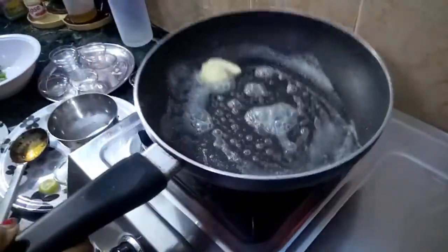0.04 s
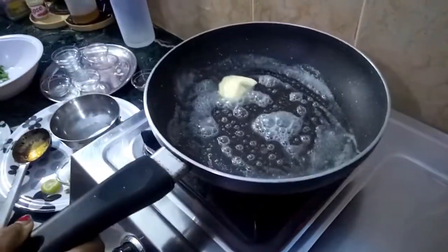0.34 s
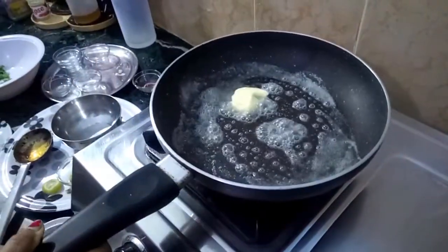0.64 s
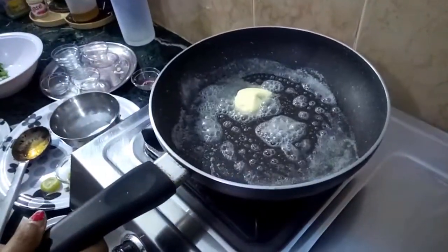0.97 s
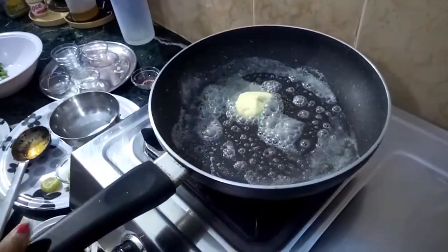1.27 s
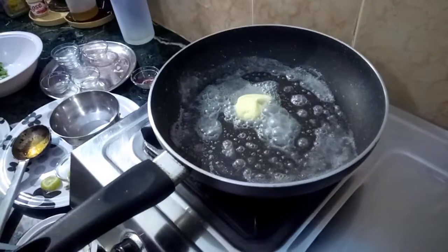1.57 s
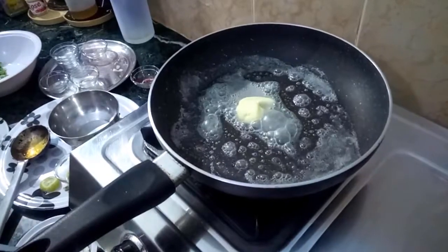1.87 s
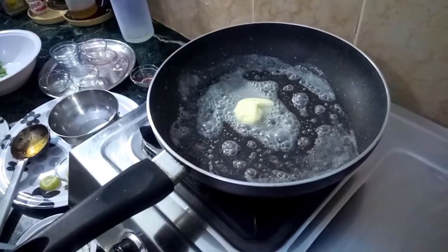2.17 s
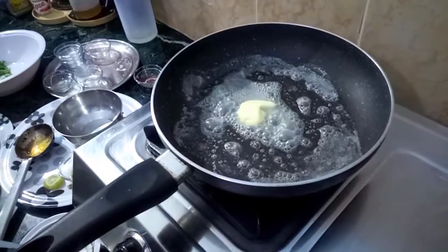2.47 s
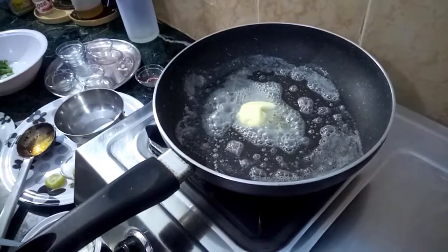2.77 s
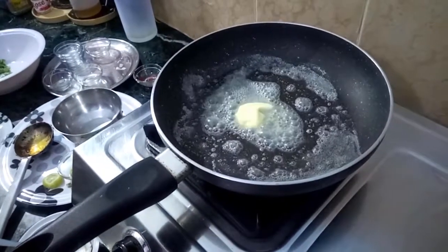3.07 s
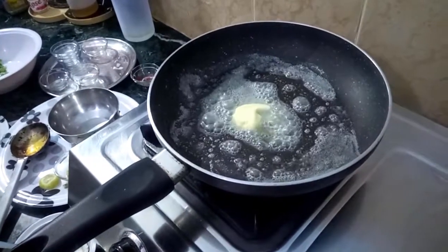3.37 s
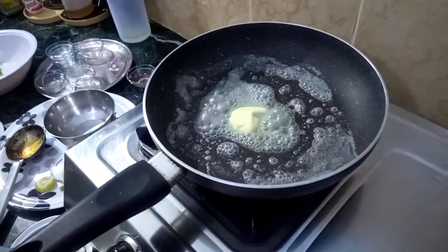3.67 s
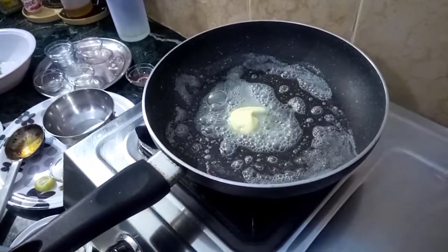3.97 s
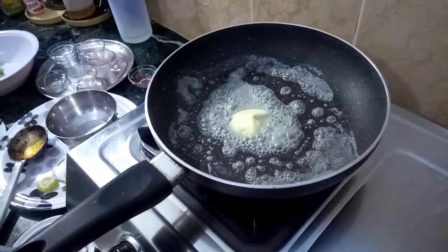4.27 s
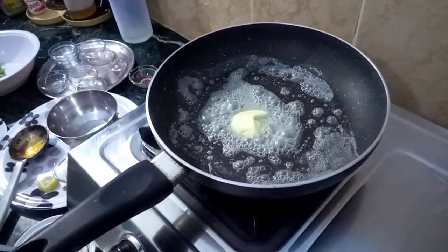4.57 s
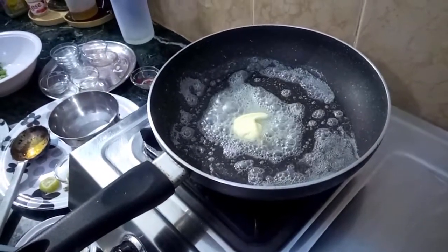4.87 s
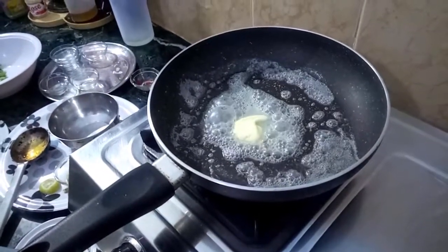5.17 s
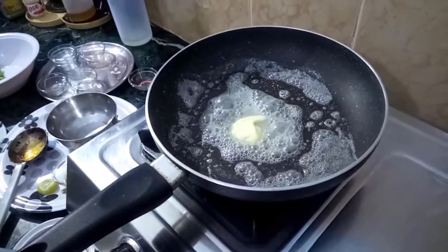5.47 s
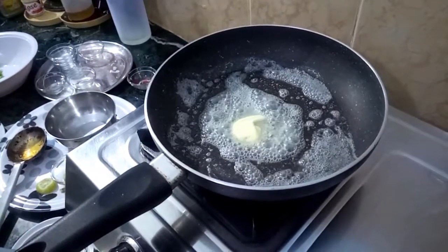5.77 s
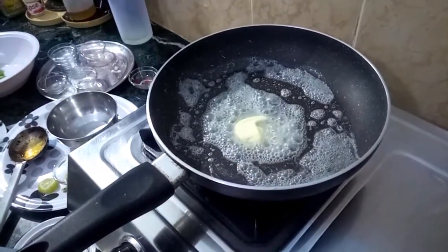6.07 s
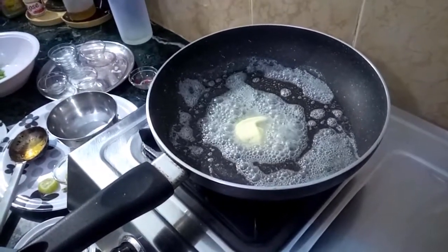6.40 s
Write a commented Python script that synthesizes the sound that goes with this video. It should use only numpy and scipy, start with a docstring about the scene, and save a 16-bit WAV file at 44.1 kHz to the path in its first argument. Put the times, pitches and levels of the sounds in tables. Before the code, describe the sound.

Butter sizzles in a frying pan from the start, a fine, high crackle that begins quietly and grows steadily louder for nearly seven seconds. A gas flame rumbles softly underneath. From about 0.6 to 1.0 seconds the pan clatters and rocks on the steel grate, a quick run of sharp, briefly ringing metal knocks, the loudest sounds here, with a faint last nudge at 1.2. The sizzle flares around 1.5 and 2.3 seconds, with lower bubbling pops mixed in. At about 2.3 a hollow utensil is bumped nearby with a few light taps and a dull scuff, and is touched faintly again around 5 seconds. From about 4 seconds on, sharp spits and short spurts of steam come more often, the strongest near 6.5. Everything is heard close, from above the stove in a small tiled kitchen.

```python
"""Butter in a frying pan on a gas stove.

A pan is set on a steel grate in a small tiled kitchen, rocks and is nudged once more; each impact
excites the damped modes of pan and grate. Water boils out of the melting butter in countless tiny
bursts that grow louder, with lower pops, sharper spits and spurts of steam. Something light is
bumped nearby. Underneath, the flame rumbles softly as noise in low resonances."""
import sys
import numpy as np
from scipy import signal
from scipy.fft import rfft, irfft
from scipy.io import wavfile
from scipy.ndimage import uniform_filter1d, map_coordinates

SR = 44100
rng = np.random.default_rng(int(sys.argv[2]) if len(sys.argv) > 2 else 0)


def persist_wave(psi):
    """Save psi, clipped to +-1, as 16-bit WAV."""
    counts = np.round(np.clip(psi, -1, 1) * 32767).astype(np.int16)
    wavfile.write(sys.argv[1], SR, np.atleast_2d(counts).T)


N = 292824
TIME = np.arange(N) / SR
FREQ = np.maximum(np.fft.rfftfreq(N, 1 / SR), 1)

# Impacts of pan on grate. Each row: start in seconds, level in dB, stove-top thump in dB, emphasis of
# the spot struck in dB, its centre in Hz, contact cut-off in Hz, direct crack in dB, its t60 in
# seconds, clack of the grate in dB.
IMPACTS = [(0.5624, -5.5, -7.5, 15, 760, 14000, 0.5, 0.039, -47),
           (0.567, -7.5, 3.5, 8, 750, 14000, -2, .04, -40.5),
           (0.592, -7.5, 3.5, 11, 940, 9000, -8, .04, -52),
           (0.637, -12, 12.5, 9, 1240, 4500, 4.5, 0.081, -50),
           (0.656, -8.5, 3.5, -22, 2950, 8000, 4, 0.023, -53),
           (0.676, -16.5, 7, 5.5, 1350, 6460, 14.5, 0.046, -49.5),
           (0.691, -22.5, 13.5, 0, 1400, 12000, 16.5, 0.033, -52),
           (0.702, -14.5, 12.5, 7.5, 620, 1960, 3.5, 0.053, -65),
           (0.8587, -18, 8, 6, 790, 3600, 4.5, 0.051, -56.5),
           (0.884, -16.5, 6.5, 7, 1380, 3000, 1, 0.071, -48.5),
           (0.95, -27, 14.5, 11, 1420, 2200, -2, .05, -67),
           (1.0032, -22.5, 9.5, 12, 1470, 3930, 7.5, 0.076, -48),
           (1.013, -22, 9, 5, 1470, 3740, -3, 0.054, -55.5),
           (1.2024, -48.5, 15, 8, 700, 2000, 17, 0.061, -72)]
# Spectrum of bursting bubbles. Each row: frequency in Hz, relative spectral level in dB.
SIZZLE_SPECTRUM = [(2600, -7.5), (3000, -5), (3600, -0.5), (4180, -2.5), (4510, -3), (5290, -2.5),
                   (6430, 1), (7150, -3.5), (8130, -14), (11200, -9), (13700, -25.5), (15000, -18),
                   (15800, -17)]


def undb(db):
    """Amplitude ratio of a level in decibels."""
    return 10 ** (np.asarray(db) / 20)


def unit(x):
    """Normalisation to an rms of 1."""
    return x / np.sqrt(np.mean(x ** 2))


def fade(t, t60):
    """Exponential decay by 60 dB in t60 seconds."""
    return np.exp(-np.log(1000) * t / t60)


def lookup(points, hz):
    """Interpolation of (Hz, value) points on a logarithmic frequency axis."""
    f, value = np.transpose(points)
    return np.interp(np.log(hz), np.log(f), value)


def colour(x, gain):
    """Minimum-phase filter: folding the cepstrum gives a causal response with the given gains."""
    cepstrum = irfft(np.log(np.maximum(gain, 1e-5)), N)
    cepstrum[1:N // 2] *= 2
    cepstrum[N // 2 + 1:] = 0
    response = irfft(np.exp(rfft(cepstrum)), N)[:N // 8]
    return signal.fftconvolve(x, response)[:N]


def passband(x, hz, kind, order):
    """Butterworth low-, high- or band-pass filter."""
    return signal.sosfilt(signal.butter(order, hz, kind, fs=SR, output="sos"), x)


def resonances(rows):
    """Summed gain of Lorentzian peaks, each given by centre in Hz, half-width in Hz and level in dB."""
    return sum(undb(db) / (1 + ((FREQ - hz) / width) ** 2) for hz, width, db in rows)


def walk(rate):
    """Slow random modulation: values held for 1 / rate seconds and smoothed twice; spread near 1."""
    hold = int(SR / rate)
    steps = rng.standard_normal(2000)[np.arange(N) // hold]
    return 1.3 * uniform_filter1d(uniform_filter1d(steps, hold), hold)


def drone(modes):
    """Forced resonance: noise rings in narrow peaks and is held at an even level."""
    x = irfft(rfft(rng.standard_normal(N)) * resonances(modes), N)
    return x / np.sqrt(uniform_filter1d(x ** 2, SR // 12))


def flame():
    """Combustion noise: a low drone, rumble and burner rush that flutter in level, over the room's air."""
    # The low drone, rumble and rush waver in level. Each row: time in seconds, then drone, rumble and
    # rush levels in dB.
    low_levels = [(0, -55, -61, -57), (.12, -68, -60, -58.5), (.3, -53.5, -73, -57.5),
                  (.45, -59.5, -61, -63), (1.3, -50.5, -55, -59.5), (1.48, -54.5, -55.5, -63),
                  (1.71, -45.5, -61, -55.5), (1.85, -72, -71.5, -61), (2, -52.5, -76, -56.5),
                  (2.2, -56, -67, -57), (2.45, -55, -54, -59), (2.66, -64, -71.5, -60.5),
                  (2.851, -47, -49.5, -64), (2.97, -59, -63, -59.5), (3.18, -59.5, -71, -62.5),
                  (3.3, -51, -51.5, -59.5), (3.46, -51, -67, -55), (3.55, -60.5, -67, -63),
                  (3.7, -53, -69, -55.5), (3.82, -51, -58, -58), (3.92, -61, -71, -70),
                  (4, -55.5, -55, -54), (4.14, -63.5, -68.5, -65), (4.3, -52.5, -54.5, -59),
                  (4.46, -51.5, -72, -57), (4.55, -72, -74, -67), (4.73, -53, -50, -55.5),
                  (4.95, -70, -78.5, -59), (5.05, -59, -54.5, -59.5), (5.33, -49.5, -68, -64),
                  (5.45, -53.5, -67, -59.5), (5.56, -65, -62, -61.5), (5.7, -50, -67, -56.5),
                  (5.83, -72, -79.5, -63.5), (5.92, -64, -68, -67), (6.06, -57, -56, -62),
                  (6.25, -56, -58, -57.5), (6.42, -51, -65.5, -61), (6.64, -52, -53, -80)]
    # Resonances of the drone and the deeper rumble. Each row: centre in Hz, half-width in Hz, level in dB.
    drone_modes = [(99.64, 2.53, 1), (152, 4.1, -15.5), (189, 17, -24.5)]
    rumble_modes = [(65.3, 4.4, 3), (59.6, 3.14, -14), (124, 22.4, -14.5)]
    # Burner rush and room air. Each row: frequency in Hz, relative spectral level in dB.
    rush_spectrum = [(15, 3.5), (25, -5.5), (45, -9), (120, 4), (190, -1.5), (270, 0), (380, -8),
                     (520, -12.5), (700, -13.5), (1200, -21), (2000, -20.5), (5000, -63.5)]
    s, *levels = np.transpose(low_levels)
    drone_db, rumble_db, rush_db = (np.interp(TIME, s, db) for db in levels)
    rush = unit(colour(rng.standard_normal(N), undb(lookup(rush_spectrum, FREQ))))
    # only the lows of the rush follow the table; the air stays nearly steady
    low_rush, air = (passband(rush, 420, kind, order=3) for kind in ("low", "high"))
    lows = undb(drone_db) * drone(drone_modes) + undb(rumble_db) * drone(rumble_modes)
    flutter = walk(21.94)
    burner = undb(1.8 * flutter) * lows + undb(rush_db + 1.2 * flutter) * low_rush
    return burner + undb(-59.5 + 2.3 * walk(12)) * air


def boiling():
    """Envelopes of sizzle and fizz in dB: a steady rise with the heat, flare-ups and slight unrest."""
    # A pocket of water reaches hot metal and the foam flares up. Each row: start in seconds, change of
    # the sizzle in dB, change of the fizz in dB, release time constant in seconds.
    flares = [(.01, -0.5, 7.5, 0.088), (.15, 0, 6, 0.047), (1.25, 1.5, 1, 0.045), (1.385, -0.5, 7, 0.033),
              (1.549, 5.5, 8.5, 0.081), (2.25, 4.5, 4.5, 0.22), (2.52, 0, 6, 0.07),
              (2.785, 3.5, 0.5, 0.133), (2.95, 1, 4, .07), (3.34, 2, 1.5, .09), (3.71, 2, 4, 0.15),
              (4.19, 2.5, 6, 0.15), (4.42, 2, 0, .07), (4.6, 1.5, -1, .1), (4.7, 1, 2, 0.098),
              (4.95, 2.5, 8, 0.055), (5.43, 4.5, 0, 0.083), (5.72, 1.5, 4, 0.11), (5.88, 1.5, 1.5, 0.145),
              (6.48, 1, 2.5, .12)]
    # Slight lifts and one dip of the boiling. Each row: centre in seconds, change in dB, half-length
    # in seconds.
    wavers = [(1.47, 0, .08), (3.192, 0.5, .03), (4.135, 0, .04), (4.86, 1, .04), (6.42, -3.5, .035)]
    boil_db = -57 + TIME  # rises by 1 dB a second
    fizz_db = -69.5 + 1.53 * TIME
    attack_s = 0.0223
    for s, boil_rise_db, fizz_rise_db, release_s in flares:
        age = TIME - s
        flare = np.clip(age / attack_s, 0, 1) * np.exp(-np.maximum(age - attack_s, 0) / release_s)
        boil_db += boil_rise_db * flare
        fizz_db += fizz_rise_db * flare
    waver_db = sum(db * np.exp(-((TIME - s) / half_s) ** 2) for s, db, half_s in wavers)
    return boil_db + waver_db + .4 * walk(14), fizz_db + waver_db + 1.7 * walk(10)


def bursts(rate, spread_db):
    """Shot noise: on average `rate` clicks a second, their levels in dB exponentially distributed."""
    occurs = rng.random(N) < rate / SR
    size = np.minimum(rng.exponential(size=N), 6)
    sign = np.sign(rng.standard_normal(N))
    return unit(occurs * sign * undb(spread_db * size))


def bubbles(count, cycles, spread_db):
    """Small bubbles as damped oscillators, each decaying by 60 dB in `cycles` periods."""
    out, t = np.zeros(N + 512), np.arange(512) / SR
    when, pitch, size = rng.random((count, 3)).T
    hz = 2500 * 6 ** pitch[:, None]  # 2.5 to 15 kHz
    gain = undb(-spread_db * np.log(np.maximum(size, .012)))[:, None]
    rings = gain * np.sqrt(hz) * np.sin(2 * np.pi * hz * t) * fade(t, cycles / hz)
    starts = (when * N).astype(int)[:, None]
    np.add.at(out, starts + np.arange(len(t)), rings)
    return unit(out[:N])


def tiles(x, wet_db, t60):
    """Diffuse reverberation: each burst leaves a decaying tail of noise between the tiled walls."""
    decay = fade(TIME[:SR // 2], t60) ** 2
    power = np.abs(signal.fftconvolve(x ** 2, decay / decay.sum())[:N])
    return x + undb(wet_db) * np.sqrt(power) * rng.standard_normal(N)


def reflect(x):
    """Early reflections from hard surfaces; the path lengths drift as the listening point sways."""
    # Echoes from the pan's wall, stove top and tiles. Each row: delay in seconds, level in dB.
    echoes = [(.0011, -19.5), (.0026, -20.5), (.0043, -32.5), (.0071, -16), (0.0108, -12), (0.018, -32)]
    return x + sum(undb(db) * np.interp(TIME - delay - 2e-5 * walk(0.92), TIME, x) for delay, db in echoes)


def patchy(x, spread_db, width_hz, span_s):
    """Amplitude modulation: narrow bands flicker in level independently, giving a patchy shimmer."""
    hz, s, spectrum = signal.stft(x, SR, nperseg=1024)
    chance = rng.standard_normal((300, 900))
    place = np.meshgrid(hz / width_hz, s / span_s, indexing="ij")
    gain = undb(spread_db * map_coordinates(chance, place, order=1, mode="mirror"))
    return unit(signal.istft(spectrum * gain, SR, nperseg=1024)[1][:N])


def butter():
    """Superposition of steam bursts and ringing bubbles in the foam, with the resonance of the bowl."""
    # Resonances of the pan's bowl. Each row: centre in Hz, half-width in Hz, level in dB.
    bowl_modes = [(1010, 180, -6), (1302, 45.2, -1), (1390, 48, 0), (1394, 170, -6)]
    boil_db, fizz_db = boiling()
    crackle = bursts(rate=5000, spread_db=3.0)
    crackle += undb(-9.5) * bubbles(count=3500, cycles=54, spread_db=1.0)
    crackle = reflect(tiles(crackle, wet_db=0.5, t60=0.134)) * undb(0.355 * walk(30))
    crackle = patchy(crackle, spread_db=2.5, width_hz=160, span_s=.04)
    spectrum = undb(lookup(SIZZLE_SPECTRUM, FREQ)) / np.sqrt(1 + (3100 / FREQ) ** 20)
    treble = 1 / (1 + (8000 / FREQ) ** 24)
    foam = unit(colour(crackle, spectrum * (1 - treble)))
    # the finest bursts are sparser and stand out one by one
    ticks = crackle + 0.4 * bursts(rate=300, spread_db=-1.0)
    ticks += .5 * bubbles(count=1200, cycles=80, spread_db=1.0)
    ticks = patchy(ticks, spread_db=2.0, width_hz=330, span_s=.025)
    fizz = unit(colour(ticks, spectrum * treble)) * undb(1.2 * walk(24))
    # the bowl gathers bursts from the whole pan; its resonances take turns to stand out
    gathered = patchy(bursts(rate=4000, spread_db=2.5), spread_db=2.5, width_hz=69.4, span_s=.04)
    bowl = unit(colour(gathered, resonances(bowl_modes)))
    bowl_db = -60.0 + 0.8 * (boil_db - boil_db.mean())
    return undb(boil_db) * foam + undb(fizz_db) * fizz + undb(bowl_db) * bowl


def pops():
    """Pitch falls with bubble size: larger bubbles burst in a sparser, lower crackle."""
    # Spectrum of the large bubbles. Each row: frequency in Hz, relative spectral level in dB.
    spectrum = [(1000, -27), (1500, -9), (1900, -7.5), (2020, -11), (2150, 2.5), (2330, -1.5), (2580, -8),
                (2900, -4), (3100, -1.5), (3500, -15.5), (5000, -35.5)]
    # The pops come in waves. Each row: time in seconds, level in dB.
    waves = [(0, -66.5), (.16, -60), (.29, -68), (.38, -63), (.5, -67.5), (1.25, -64.5), (1.535, -69),
             (1.57, -55), (1.68, -61.5), (1.76, -60), (1.92, -62.5), (2.2, -63.5), (2.3, -59), (2.65, -65),
             (2.85, -59.5), (3.19, -64), (3.3, -60.5), (3.5, -61), (3.7, -59), (4.15, -60), (4.25, -59.5),
             (4.4, -58), (4.7, -58.5), (5.0, -61), (5.45, -57.5), (5.64, -61.5), (5.72, -56), (6.1, -58),
             (6.64, -54.5)]
    crackle = reflect(tiles(bursts(rate=1500, spread_db=3.0), wet_db=1, t60=.15))
    crackle = patchy(crackle, spread_db=3.0, width_hz=160, span_s=.045)
    level_db = np.interp(TIME, *np.transpose(waves))
    return undb(level_db) * unit(colour(crackle, undb(lookup(spectrum, FREQ))))


def crowded(hz, spacing_hz=35, spread_db=4.5, full_depth_hz=2000):
    """Modal overlap: the pan's many weak upper modes merge into an uneven comb."""
    heights = np.interp(hz / spacing_hz, np.arange(1000), rng.standard_normal(1000))
    comb = undb(spread_db * heights * np.minimum(hz / full_depth_hz, 1))
    return comb / np.sqrt(uniform_filter1d(comb ** 2, size=1000))


def contact(hz, db, thump_db, spot_db, spot_hz, cut_hz):
    """Excitation spectrum of a blow, set by stove-top thump, spot struck and softness of the contact."""
    thump = thump_db / (1 + (np.log2(hz / 275) / 0.69) ** 2)
    spot = spot_db / (1 + (np.log2(hz / spot_hz) / 0.31) ** 2)
    return undb(db + thump + spot) / np.sqrt(1 + (hz / cut_hz) ** 6)


def pan():
    """Impact excitation: every blow feeds the same damped modes and a dense clatter of crowded ones."""
    # Modes of pan and stove top. Each row: frequency in Hz, relative level in dB, t60 in seconds.
    modes = [(97.8, -13, 2.3), (168, -11, 1), (203, -9, .7), (246, -3, .78), (289, -2, .85), (322, -8, .97),
             (362, -4.5, .8), (420, -.5, .55), (488, -11, .9), (555, -5, .55), (576, -3, .55),
             (609, -4.5, .55), (667, -1, .55), (686, -7, .45), (739, 1.5, .36), (750, -5, .2),
             (788, -9, .35), (903, -2.5, .38), (963, -5, .32), (1028, -9, .4), (1096, -7, .45),
             (1116, -11, .4), (1167, -9, .45), (1260, -12, .5), (1286, -13, .4), (1394, -14, .55),
             (1588, -11, .35), (1764, -15, .5), (1916, -12, .35), (2004, -9, .4), (2017, -6.5, .42),
             (2207, -11, .35), (2551, -8.5, .4), (2825, -11, .35), (2865, -10, .35), (2919, -9, .45),
             (2980, -11, .35), (3076, -14, .35), (3203, -13, .35), (3340, -13, .35), (3400, -13, .35),
             (3457, -14, .45), (3833, -15, .4), (4321, -11, .28), (4450, -13, .3), (4490, -14, .3),
             (4729, -14, .3), (4795, -15, .3), (5491, -16, .28), (5915, -10, .3), (5943, -5.5, .34),
             (6126, -15, .3), (6185, -11, .3), (6551, -11, .28), (6885, -12, .32), (7843, -17, .3),
             (8156, -22, .15), (8538, -15, .3), (8931, -22, .28), (9025, -21, .28), (9243, -24, .3),
             (9588, -20, .33), (10680, -14, .3), (10920, -16, .3), (11040, -20, .3), (12150, -18.5, .28),
             (12270, -18.5, .22), (12900, -26, .17), (13440, -25, .17)]
    # Dense modes and their kitchen echo. Each row: frequency in Hz, relative spectral level in dB.
    clatter_spectrum = [(35, -44.5), (60, -32), (93, -18.5), (139, -16), (242, -7), (385, -11.5), (738, -9),
                        (849, -13), (931, -10.5), (4630, -27), (5200, -33), (6120, -24.5), (7370, -40),
                        (12300, -53), (15500, -104)]
    # Decay of that clatter. Each row: band centre in Hz, t60 in seconds.
    clatter_decay = [(150, 0.92), (500, 0.67), (1500, 0.5), (4000, 0.61), (12000, 0.5)]
    out, t = np.zeros(N), TIME[:2 * SR]
    hz = np.maximum(np.fft.rfftfreq(len(t), 1 / SR), 1)
    mode_hz, mode_db, mode_t60 = np.transpose(modes)[:, :, None]
    centres, t60s = np.transpose(clatter_decay)
    band_shares = np.array([np.interp(np.log(hz), np.log(centres), row) for row in np.eye(len(centres))])
    spectrum = crowded(hz) * unit(undb(lookup(clatter_spectrum, hz)))
    spectrum /= np.sqrt(1 + (80 / hz) ** 10)  # a small pan radiates little bass
    energy = 0
    for s, *blow, crack_db, crack_t60, _ in IMPACTS:
        age = np.maximum(t - s, 0)
        onset = 1 - fade(age, .003)
        excitation = contact(hz, *blow) * rfft(rng.standard_normal(len(t)))
        bands = irfft(band_shares * spectrum * excitation, len(t))
        # a short direct crack, and a tail whose bass lasts longest
        envelopes = undb(crack_db) * fade(age, crack_t60) + fade(age, t60s[:, None])
        out[:len(t)] += undb(-20.5) * onset * (bands * envelopes).sum(axis=0)
        # blows fall at unrelated phases, so their energies add in each mode
        energy = energy + (onset * contact(mode_hz, *blow) * fade(age, mode_t60)) ** 2
    # shifting contact with the grate makes each mode waver in pitch and strength
    waver_cycles = 0.024 * np.array([walk(25.0)[:len(t)] for _ in modes])
    sway_db = 1.27 * np.array([walk(25.0)[:len(t)] for _ in modes])
    rings = np.sin(2 * np.pi * (mode_hz * t + rng.random(mode_hz.shape) + waver_cycles))
    out[:len(t)] += (undb(mode_db - 28.5 + sway_db) * np.sqrt(energy) * rings).sum(axis=0)
    return out


def ringing(modes, t):
    """Free vibration: damped modes start together at random phases; rms 1."""
    hz, db, t60 = np.transpose(modes)[:, :, None]
    tones = np.sin(2 * np.pi * (hz * t + rng.random(hz.shape)))
    return unit((undb(db) * tones * fade(t, t60)).sum(axis=0))


def grate():
    """Each impact gives a contact transient of metal on metal and a short free ring of the grate."""
    # Modes of the steel grate. Each row: frequency in Hz, relative level in dB, t60 in seconds.
    modes = [(1316, 0, 0.2), (1362, -2, 0.16), (1513, 1, 0.163), (1906, -11.5, 0.21), (2000, -6.5, .1),
             (2153, -8, 0.273), (2420, -15.5, 0.22), (2576, -10, 0.1966), (2595, -10.5, 0.216),
             (2840, -13.5, 0.13), (3005, -10, 0.2), (3490, -17, .2), (3700, -22, 0.18)]
    out, t = np.zeros(N), TIME[:SR // 2]
    onset = 1 - fade(t, 0.0036)
    for s, *_, clack_db in IMPACTS:
        noise = unit(passband(rng.standard_normal(len(t)), (1200, 4000), "band", order=4))
        tick = undb(13.5) * noise * fade(t, t60=.022)
        out[int(s * SR):][:len(t)] += undb(clack_db) * (ringing(modes, t) + tick) * onset
    return out


def spits():
    """Sudden vaporisation: a larger water drop bursts with a snap, a short ring and a puff of steam."""
    # The loudest drops. Each row: start in seconds, level in dB, pitch in Hz.
    drops = [(1.707, -43, 3820), (1.8027, -42, 4880), (2.97, -44, 11000), (3.9353, -35.5, 6330),
             (4.0106, -37.5, 6310), (4.632, -36, 6330), (4.647, -35, 6870), (4.7323, -37, 6100),
             (4.9355, -38.5, 4500), (5.0944, -36.5, 10440), (5.387, -39, 1370), (5.3865, -44, 2150),
             (5.6737, -39, 2280), (5.764, -46, 3530), (5.903, -40, 6470), (5.9365, -34, 6900),
             (6.035, -37, 2180), (6.104, -38.5, 10500), (6.1962, -35, 6500), (6.3617, -42, 3560),
             (6.473, -36, 6630), (6.4784, -28, 6600), (6.4782, -33.5, 3550), (6.523, -42, 9900),
             (6.5738, -33, 6300), (6.6103, -39, 6540)]
    snaps, rings, t = np.zeros(N + SR), np.zeros(N + SR), TIME[:SR // 10]
    ring_age = np.maximum(t - 0.0014, 0)  # a drop squeals for 1.4 ms before its ring decays
    for s, db, hz in drops:
        snap, steam = rng.standard_normal((2, len(t)))
        burst = 0.63 * snap * fade(t, 0.0054) + 0.37 * steam * fade(t, 0.28)
        ring = 0.54 * np.sin(2 * np.pi * hz * t) * fade(ring_age, 30 / hz)
        snaps[int(s * SR):][:len(t)] += undb(db) * burst
        rings[int(s * SR):][:len(t)] += undb(db) * ring
    snaps = colour(snaps[:N], undb(lookup(SIZZLE_SPECTRUM, FREQ)))
    # drops this small radiate no lows
    return passband(snaps, 2200, "high", order=4) + rings[:N]


def bumps():
    """Soft impacts on a hollow utensil: a tap, a dull scuff and a short ring of its modes."""
    # The utensil is shifted nearby. Each row: start in seconds, levels of scuff, ring and tap in dB,
    # pitch of the tap in Hz.
    touches = [(2.241, -42, -66, -38, 850), (2.247, -48, -64, -36, 1670), (2.298, -40.5, -60.5, -33, 560),
               (2.322, -45, -74.5, -50, 750), (2.341, -38.5, -79, -42, 1250), (4.869, -57, -70.5, -49, 420),
               (5.129, -59, -70.5, -54, 450)]
    # Its hollow modes. Each row: frequency in Hz, relative level in dB, t60 in seconds.
    modes = [(427, 11.5, 0.12), (518, -3.5, 0.65), (590, -7, 1), (720, -2, 0.17), (743, -6, 0.88),
             (1710, 3.5, 0.18)]
    # Its scuff. Each row: frequency in Hz, relative spectral level in dB.
    scuff_spectrum = [(150, -34), (350, 4), (800, 3.5), (1600, 0), (2300, -1), (4000, -10), (8000, -55)]
    scuffs, rings, t = np.zeros(N + SR), np.zeros(N + SR), TIME[:SR // 2]
    onset = 1 - fade(t, 0.0092)
    for s, scuff_db, ring_db, tap_db, tap_hz in touches:
        tap = undb(tap_db) * np.sin(2 * np.pi * tap_hz * t) * fade(t, t60=0.024)
        scuff = undb(scuff_db) * rng.standard_normal(len(t)) * fade(t, t60=0.34)
        scuffs[int(s * SR):][:len(t)] += onset * scuff
        rings[int(s * SR):][:len(t)] += onset * (undb(ring_db) * ringing(modes, t) + tap)
    return colour(scuffs[:N], undb(lookup(scuff_spectrum, FREQ))) + rings[:N]


def spurts():
    """Band-limited shot noise: a jet of steam is a quick run of bursts gathered round one pitch."""
    # Steam escapes from under the foam. Each row: start in seconds, level in dB, centre in Hz,
    # half-width in Hz, t60 in seconds.
    jets = [(3.935, -56, 4030, 1210, 0.12), (4.681, -49, 3120, 690, 0.24), (4.733, -48, 4930, 700, 0.19),
            (5.762, -48, 3700, 398, 0.12), (6.473, -46, 3500, 400, 0.015), (6.485, -52, 5270, 1800, .2)]
    out, crackle = np.zeros(N), rfft(bursts(rate=6000, spread_db=3.5))
    for s, db, hz, width_hz, t60 in jets:
        age = np.maximum(TIME - s, 0)
        jet = unit(irfft(crackle * resonances([(hz, width_hz, 0)]), N))
        out += undb(db) * jet * (1 - fade(age, 0.005)) * fade(age, t60)
    return out


def scene():
    """Superposition of all sources at one point above the stove."""
    return (pan() + grate() + bumps() + butter() + pops() + spits() + spurts() + flame())[None]


def record(dry):
    """Band limiting: a steep elliptic low-pass removes the treble above 15.8 kHz."""
    return signal.sosfilt(signal.ellip(10, .2, 80, 15800, fs=SR, output="sos"), dry)


dry = scene()
out = record(dry)
persist_wave(out)
```